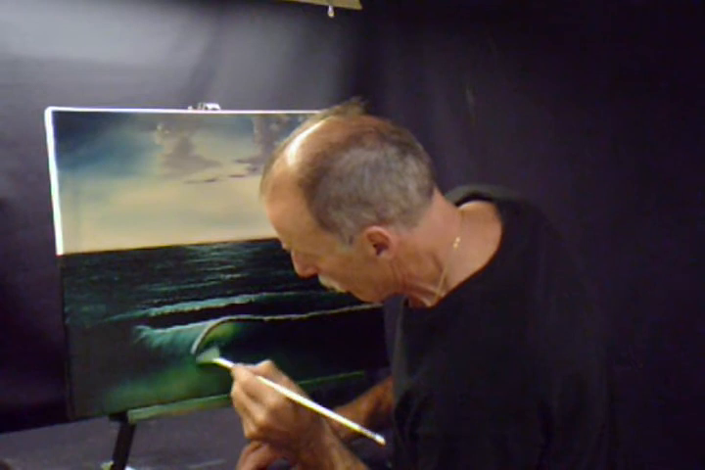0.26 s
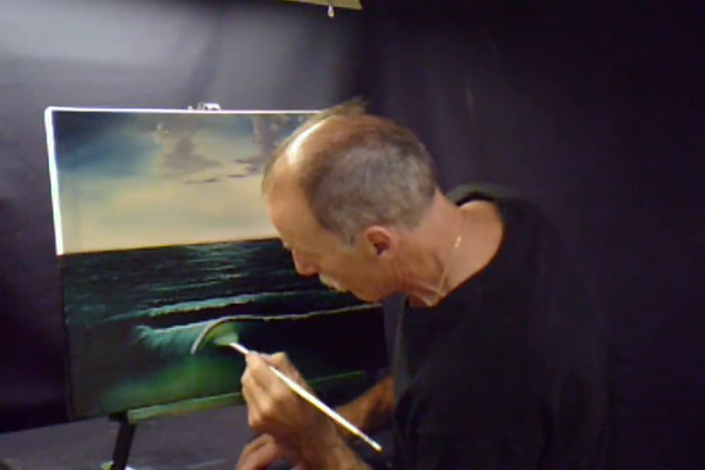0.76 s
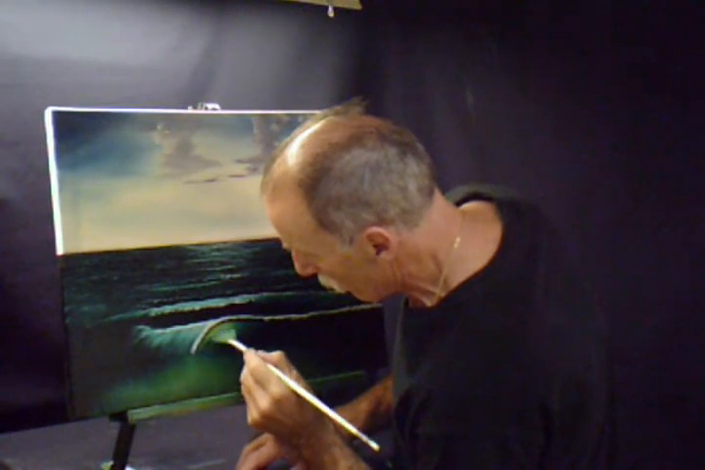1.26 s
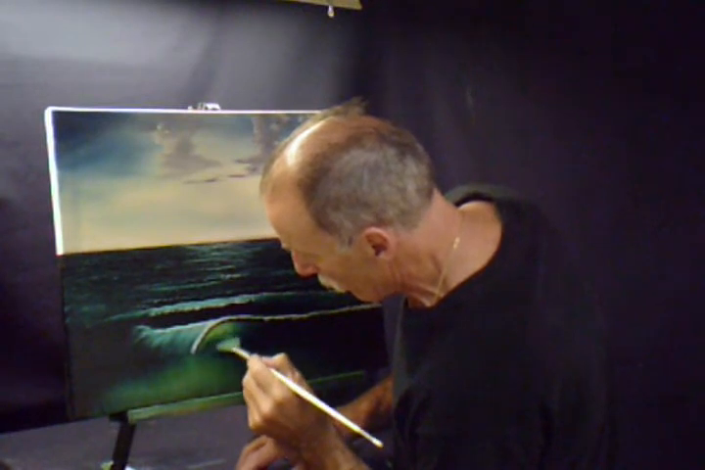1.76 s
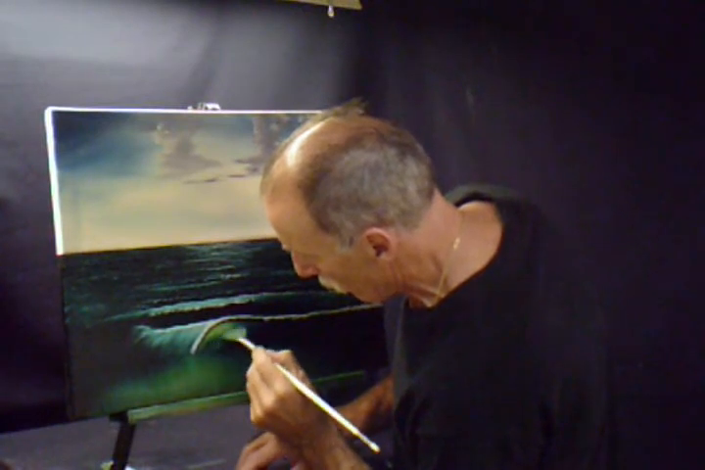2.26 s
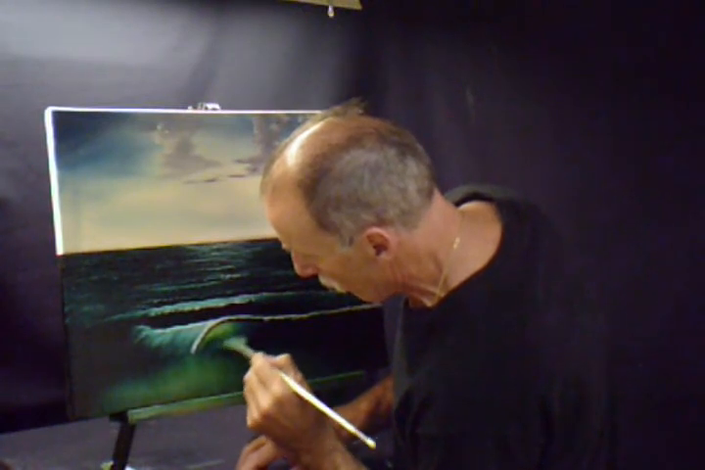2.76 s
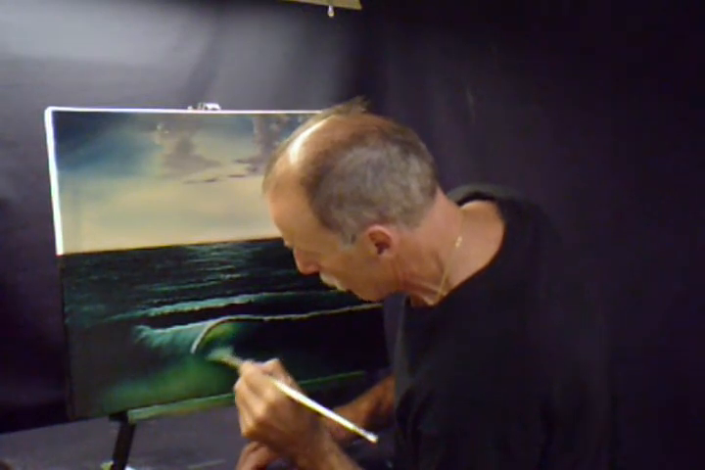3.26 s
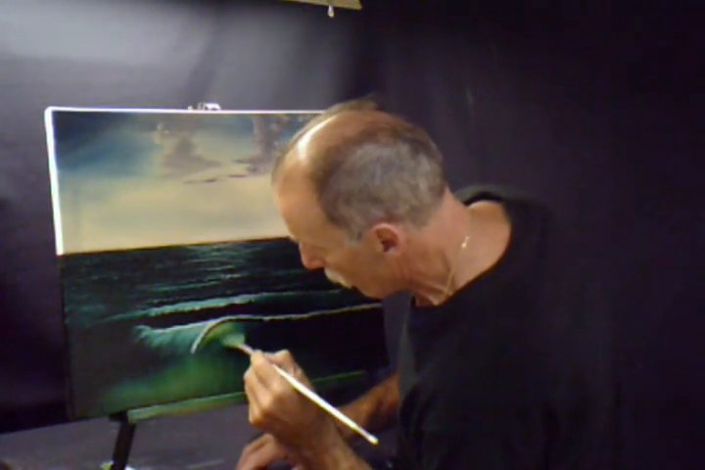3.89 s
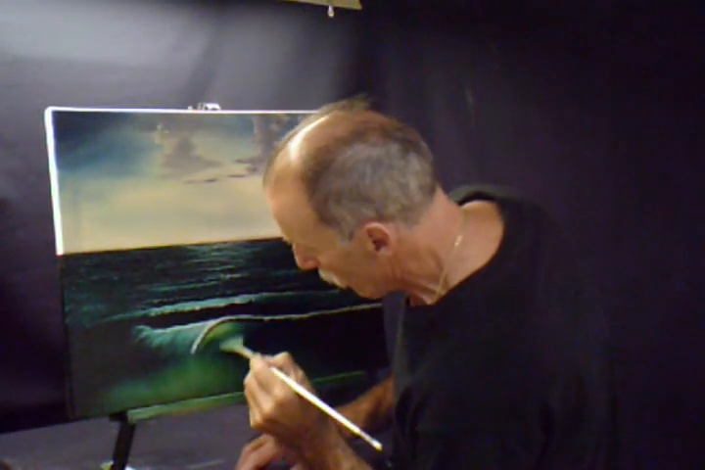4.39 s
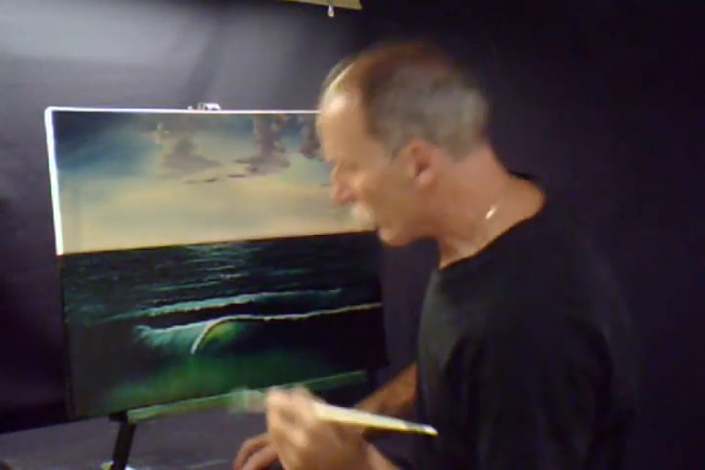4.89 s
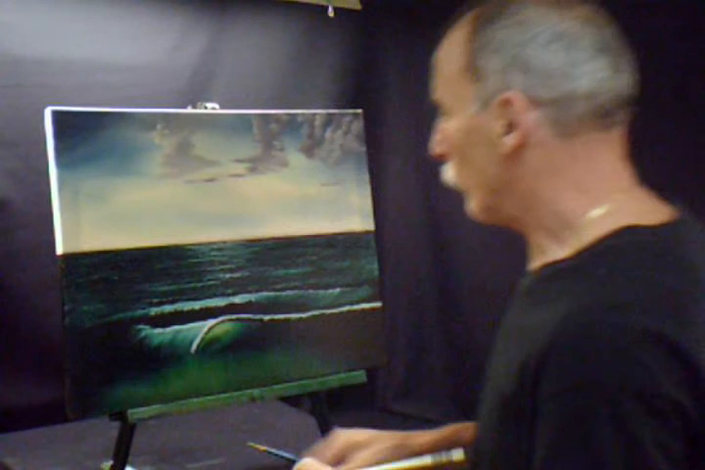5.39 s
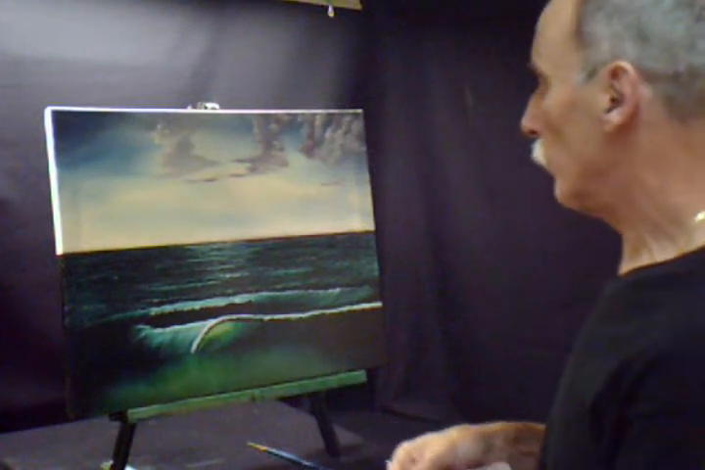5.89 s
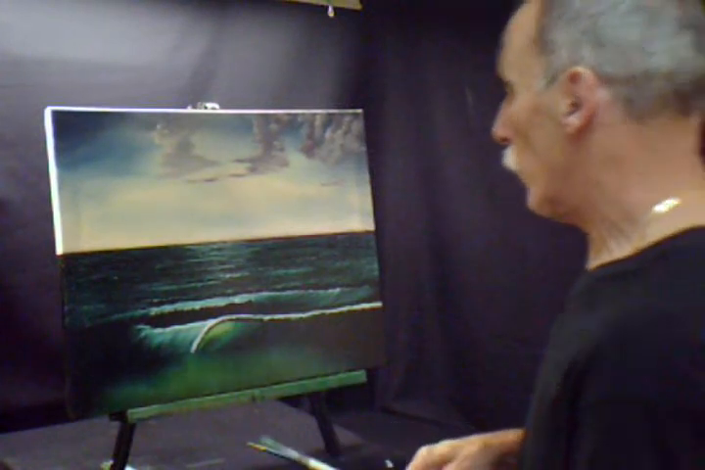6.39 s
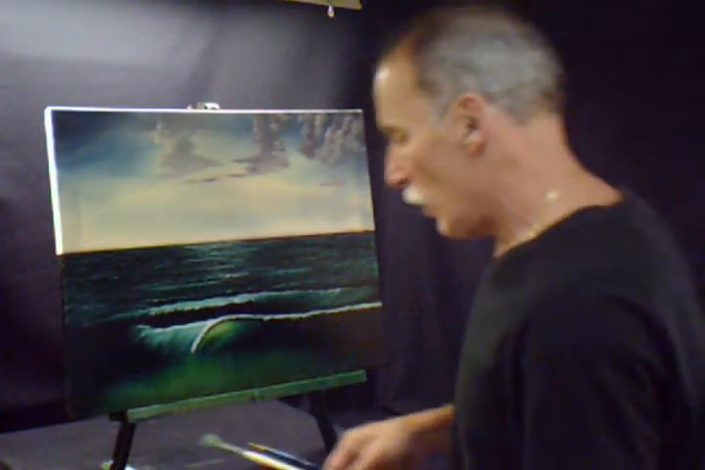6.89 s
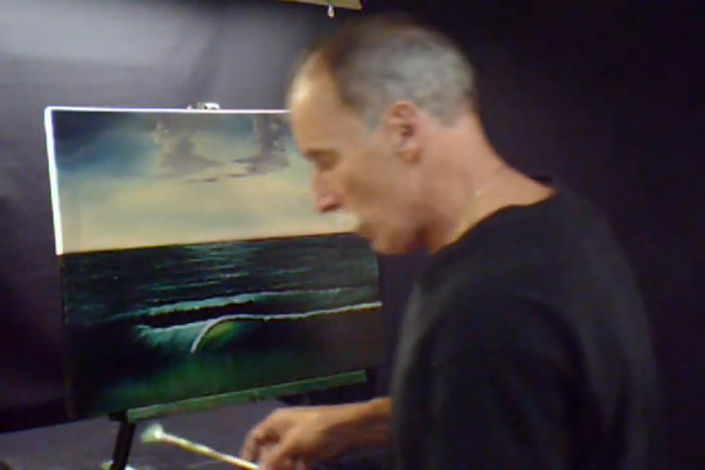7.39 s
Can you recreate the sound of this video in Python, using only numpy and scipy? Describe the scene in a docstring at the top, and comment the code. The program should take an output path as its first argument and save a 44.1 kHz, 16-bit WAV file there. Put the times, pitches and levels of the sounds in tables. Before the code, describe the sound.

A quiet room's rumbling microphone line throbs with rapid, regular low thumps, each edged by buzz and faint twitters, faltering near the end.

```python
"""A quiet room: a painter dabs at a canvas while a deep, drum-like thump repeats five times a second.
The thump is most likely pulsed interference in the microphone line: square pulses through a leaky coupling,
each with a thin buzz, a swish and chirps. It skips half a beat once and ends in a few stray pulses.
Shaped noise makes the rumble and hiss; resonant noises make soft knocks, scuffs and one high buzzing hiss.
The whole level creeps up steadily and now and then snaps down, with a click if it cuts into a thump."""
import sys
import numpy as np
from scipy import signal
from scipy.fft import rfft, irfft
from scipy.io import wavfile
from scipy.ndimage import uniform_filter1d

SR = 44100
rng = np.random.default_rng(int(sys.argv[2]) if len(sys.argv) > 2 else 0)


def wav_out(sig):
    """Save sig, one row per channel (or a flat mono array), as 16-bit PCM at SR to the path in sys.argv[1]."""
    wavfile.write(sys.argv[1], SR, np.round(np.clip(np.atleast_2d(sig).T, -1, 1) * 32767).astype(np.int16))


N = 336924
TIME = np.arange(N) / SR


def amp(db):
    """Decibels to gain."""
    return 10 ** (np.asarray(db) / 20)


def evened(x):
    """Scales to an rms of one."""
    return x / np.sqrt(np.mean(x ** 2) + 1e-20)


def noise(spectrum):
    """White noise shaped by (pitch_hz, density_db) points, at unit rms."""
    hz = np.fft.rfftfreq(N, 1 / SR)
    point_hz, point_db = np.transpose(spectrum)
    shape_db = np.interp(np.log(hz + 1), np.log(point_hz + 1), point_db)
    return evened(irfft(rfft(rng.standard_normal(N)) * amp(shape_db), N))


def flutter(hz):
    """Random wavering of unit rms that fades out steeply above hz."""
    return noise([(1, 0), (hz, 0), (2 * hz, -40), (8 * hz, -120)])


def ringing(hz, width_hz):
    """White noise through one steep, doubled resonance, at unit rms."""
    pole = np.exp((2j * np.pi * hz - np.pi * width_hz) / SR)
    return evened(signal.lfilter([1], np.poly([pole, pole]), rng.standard_normal(N)).real)


def wavering(hz, width_hz):
    """A tone of unit rms whose phase wanders at random, smearing it over the given width."""
    wander = np.sqrt(2 * np.pi * width_hz / SR) * np.cumsum(rng.standard_normal(N))
    return np.sqrt(2) * np.sin(2 * np.pi * hz * TIME + uniform_filter1d(wander, size=40))


# spectrum of the rumble and hiss: pitch_hz, density_db (relative)
FLOOR_SPECTRUM = [(8, -1.5), (20, -0.5), (42, 1.5), (63, -12), (90, -8.5), (130, -19.5), (180, -22.5),
                  (270, -25), (380, -29.5), (500, -31.5), (1000, -37), (2000, -42), (4000, -44),
                  (12800, -46)]
# slow drift of the rumble and hiss: time_s, drift_db
FLOOR_DRIFT = [(0, -2), (2.9, 0.5), (4.4, 0.5), (5.6, 0.5), (6.6, -0.5), (7.64, -1.5)]
# steady electronic whines, before the level ride and treble roll-off: pitch_hz, rms_db
WHINE_TONES = [(4200, -73.5), (7400, -78), (8400, -79.5), (9210, -74), (9600, -68), (12450, -70)]


def background(floor_db=-31.0, flutter_db=1.16, flutter_hz=18):
    """Shaped noise for rumble and hiss, drifting slowly and fluttering a little, with thin sine whines."""
    drift_db = np.interp(TIME, *np.transpose(FLOOR_DRIFT))
    floor = amp(floor_db + drift_db + flutter_db * flutter(flutter_hz)) * noise(FLOOR_SPECTRUM)
    whines = np.zeros(N)
    for hz, db in WHINE_TONES:
        whines += amp(db) * np.sqrt(2) * np.sin(2 * np.pi * (hz * TIME + rng.random()))
    return floor + whines


# the beat comes in two even trains: first_pulse_s, pulse_count
PULSE_TRAINS = [(.0822, 17), (3.404, 19)]
PERIOD_S = .2013


def beats():
    """Start times of the regular pulses, one period apart within each train."""
    return [first + PERIOD_S * k for first, count in PULSE_TRAINS for k in range(count)]


# pulses that end the beat:
# start_s, size_db (scales the saturated thump, before the coupling), length_s, buzz_db (before trims)
STRAY_PULSES = [(7.2295, -1, 0.032, -46), (7.2825, 0, 0.0016, -40.5), (7.332, 0.5, 0.0035, -42),
                (7.533, -0.2, .0034, -43)]
PULSE_DB, PULSE_S, BUZZ_DB = 1.73, .0158, -41  # the same three settings for every regular pulse


def pulses():
    """Like pulses on every beat, then the strays, as rows of start_s, size_db, length_s, buzz_db."""
    return [(s, PULSE_DB, PULSE_S, BUZZ_DB) for s in beats()] + list(STRAY_PULSES)


def thumps(charge_s=0.012, leak_s=0.089, drive=1.0, coupling_hz=9.8):
    """Each square pulse charges the line towards saturation; the coupling capacitor swings it back past zero."""
    out = np.zeros(N)
    age = np.arange(SR) / SR

    def step(age):
        """The line's answer to a switch-on: a quick charge that leaks away."""
        age = np.maximum(age, 0)
        return np.exp(-age / leak_s) - np.exp(-age / charge_s)

    for start, size_db, length, _ in pulses():
        charge = step(age) - step(age - length)  # switched on, then off
        thump = amp(size_db) * np.tanh(drive * charge) / drive
        part = out[max(round(start * SR), 0):][:SR]
        part -= thump[:len(part)]
    return signal.lfilter(*signal.butter(1, coupling_hz, "high", fs=SR), out)


# tones mixed into the buzz: pitch_hz, width_hz, level_db (relative)
BUZZ_TONES = [(1682, 360, -3), (3357, 300, -6.5), (5630, 281, -6), (5926, 57, 2.5), (6100, 55, 0),
              (6300, 600, -25), (6640, 57, -4), (6910, 76, -0.5), (7240, 360, -15), (7880, 63, -4.5),
              (8540, 620, -20), (9250, 61, -2.5), (9640, 299, -6), (10070, 300, -11), (11740, 230, -7.5),
              (12700, 250, -3.5)]
# spurts of buzz on a pulse: centre_share, width_share (both of the pulse length), level_db (relative)
BUZZ_SPURTS = [(.28, 0.27, -3.5), (.55, 0.06, -1), (.74, 0.053, -11), (1.02, 0.13, 0)]
# spectrum of the rasp: pitch_hz, density_db (relative)
RASP_SPECTRUM = [(60, -15), (170, -9.5), (270, 10.5), (400, -3.5), (800, -5), (1600, -15.5), (3500, -18.5),
                 (5000, -19.5), (9500, -13.5), (12500, -19.5)]


def buzz(buzz_db=-1, rasp_db=-1, uneven_db=2, rasp_uneven_db=1.0, rasp_at=0.44, rasp_width=0.72):
    """Spurts of smeared high tones ride on each pulse, over a duller rasp of shaped noise."""
    spurts, rasp = np.zeros(N), np.zeros(N)
    chance = rng.standard_normal((len(pulses()), len(BUZZ_SPURTS) + 1))
    for (start, _, length, db), luck in zip(pulses(), chance):
        span = slice(max(round((start - .03) * SR), 0), round((start + .09) * SR))
        share = (TIME[span] - start) / length  # 0 to 1 across the pulse
        for (at, width, size_db), k in zip(BUZZ_SPURTS, luck):
            swell = np.exp(-.5 * ((share - at) / width) ** 2)
            spurts[span] += amp(db + size_db + uneven_db * k) * swell
        rasp_swell = np.exp(-((share - rasp_at) / rasp_width) ** 2)
        rasp[span] += amp(db + rasp_uneven_db * luck[-1]) * rasp_swell
    tones = evened(sum(amp(db) * wavering(hz, width) for hz, width, db in BUZZ_TONES))
    return amp(buzz_db) * spurts * tones + amp(rasp_db) * rasp * noise(RASP_SPECTRUM)


# spectrum of the swish: pitch_hz, density_db (relative)
SWISH_SPECTRUM = [(200, -17), (700, 5), (1500, 0.5), (3000, -1), (5000, -1), (12000, -14)]


def swishes(swish_db=-54, after_s=0.053, width_s=.011, uneven_db=3):
    """A small, uneven swell of hiss comes after each regular pulse, as the backswing settles."""
    swell = np.zeros(N)
    for start, k in zip(beats(), rng.standard_normal(len(beats()))):
        swell += amp(uneven_db * k) * np.exp(-((TIME - start - after_s) / width_s) ** 2)
    return amp(swish_db) * swell * noise(SWISH_SPECTRUM)


# chirps after each regular pulse, before chance and treble roll-off:
# delay_s, length_s, first_hz, last_hz, peak_db
CHIRP_GLIDES = [(.043, .027, 2400, 10600, -51.5), (.099, .017, 10000, 6200, -53.5),
                (.148, .016, 11500, 7500, -51.5)]


def chirps(late_s=.003, stray=0.14, uneven_db=2, fray_hz=480):
    """The line twitters about every 50 ms: a thin upward glide, then two downward, bent and frayed by chance."""
    out, jitter = np.zeros(N), flutter(660)
    chance = rng.standard_normal((len(beats()), len(CHIRP_GLIDES), 7))
    for start, lucks in zip(beats(), chance):
        for (delay, length, first, last, db), (when, loud, fray, *bends) in zip(CHIRP_GLIDES, lucks):
            at = round((start + delay + late_s * when) * SR)
            span = slice(at, at + round(length * SR))
            u = (TIME[span] - at / SR) / length  # 0 to 1 along the glide
            bend = 1 + stray * np.interp(u, np.linspace(0, 1, len(bends)), bends)
            hz = (first + (last - first) * u) * bend
            hz = hz + fray_hz * (.5 + abs(fray)) * jitter[span]
            swell = np.sqrt(abs(np.sin(np.pi * u)))
            tone = np.sin(2 * np.pi * np.cumsum(hz) / SR)
            out[span] += amp(db + uneven_db * loud) * swell * tone
    return out


# the level falls suddenly: time_s, level_db (where the climb restarts)
LEVEL_SNAPS = [(.5186, -4), (1.7317, -2.5), (2.138, -2.5), (2.9392, -9), (4.4485, -1.8), (4.833, -2.5),
               (5.4581, -1.9), (6.0625, -2.5), (6.6658, -3.5)]
START_DB, CREEP_DB_PER_S = -0.6, 6


def level():
    """A sawtooth in dB: a steady climb between sudden drops; one that cuts into a thump's backswing clicks."""
    db = START_DB + CREEP_DB_PER_S * TIME
    for snap, low_db in LEVEL_SNAPS:
        db = np.where(TIME > snap, low_db + CREEP_DB_PER_S * (TIME - snap), db)
    return amp(db)


# small crackles in the line, one of them at 6.06 s where the level snaps down; before the level ride and treble
# roll-off: start_s, peak_db
CRACKLES = [(1.496, -32.5), (4.2106, -27.5), (5.424, -24), (5.854, -29), (6.0623, -36), (6.44, -35),
            (7.1736, -30)]


def ticks(relax_s=.0006):
    """Each crackle is a tiny drop of voltage that relaxes at once."""
    jumps = np.zeros(N)
    for start, db in CRACKLES:
        jumps[round(start * SR)] = -amp(db)
    return signal.lfilter([1], [1, -np.exp(-1 / (relax_s * SR))], jumps)


# soft knocks and scuffs, and one high buzzing hiss on the last long pulse;
# levels before swell, level ride and treble roll-off:
# start_s, rms_db, rise_s, decay_s, centre_hz, width_hz
SOFT_NOISES = [(1.8, -58, 0.22, .6, 1040, 220), (2.5, -54, 0.046, .04, 1940, 490),
               (5.53, -42, 0.011, 0.016, 910, 600), (5.65, -49, 0.058, 0.044, 1500, 2400),
               (5.7, -50, .015, 0.05, 1770, 202), (7.173, -31.5, 0.007, 0.038, 204, 237),
               (7.171, -39, .001, 0.015, 1040, 1500), (7.22, -47, 0.018, 0.026, 9500, 4000)]


def scuffs():
    """Each is noise in one resonance that swells in a straight line and dies exponentially."""
    out = np.zeros(N)
    for start, db, rise, decay, hz, width in SOFT_NOISES:
        age = np.maximum(TIME - start, 0)
        swell = np.minimum(age / rise, 1) * np.exp(-np.maximum(age - rise, 0) / decay)
        out += amp(db) * swell * ringing(hz, width)
    return out


def scene():
    """Everything in the line that the level ride acts on."""
    return (background() + thumps() + buzz() + swishes() + ticks() + scuffs())[None]


# treble roll-off: pitch_hz, gain_db (the end gains hold beyond the table)
TREBLE_ROLLOFF = [(9600, 1), (11000, -9), (12600, -14.5), (13150, -18)]
EDGE_HZ = 13150


def record(dry, hiss_db=-55):
    """The level rides the whole line; hiss and chirps enter after it; then the treble rolls off to a steep edge."""
    line = dry[0] * level() + amp(hiss_db) * rng.standard_normal(N) + chirps()
    hz = np.fft.rfftfreq(2 * N, 1 / SR)  # double length keeps the end from wrapping round to the start
    gain = amp(np.interp(hz, *np.transpose(TREBLE_ROLLOFF)))
    out = irfft(rfft(line, 2 * N) * gain)[:N]
    edge = signal.firwin(255, EDGE_HZ, window=("kaiser", 9), fs=SR)
    return signal.oaconvolve(out, edge, "same")[None]


dry = scene()
out = record(dry)
wav_out(out)
```